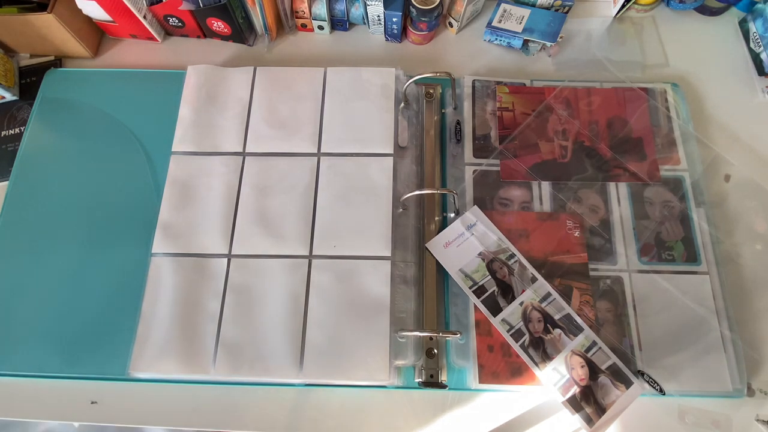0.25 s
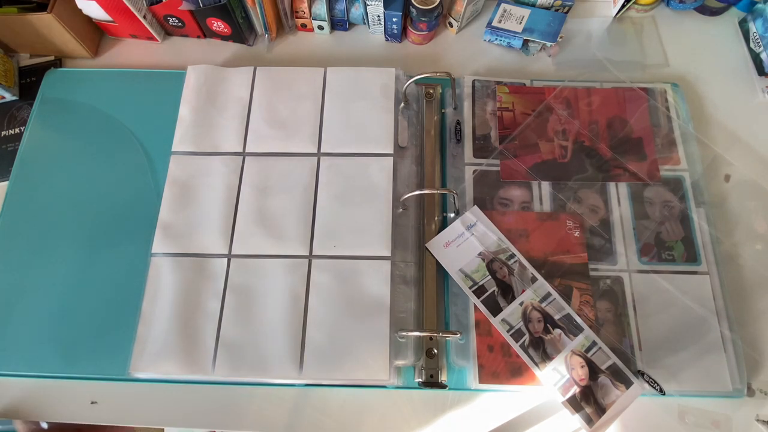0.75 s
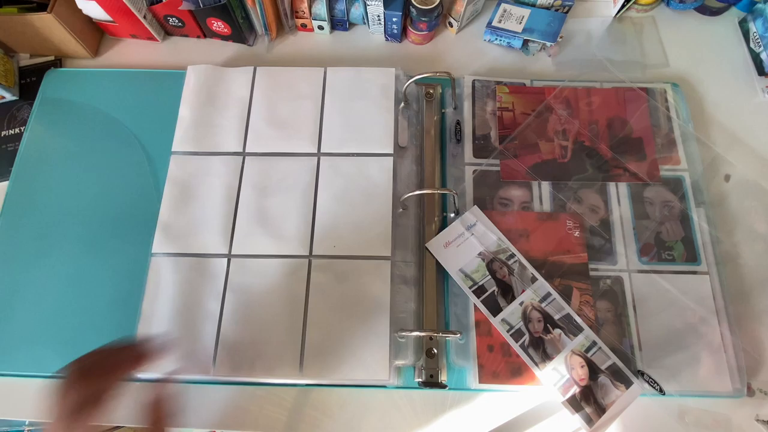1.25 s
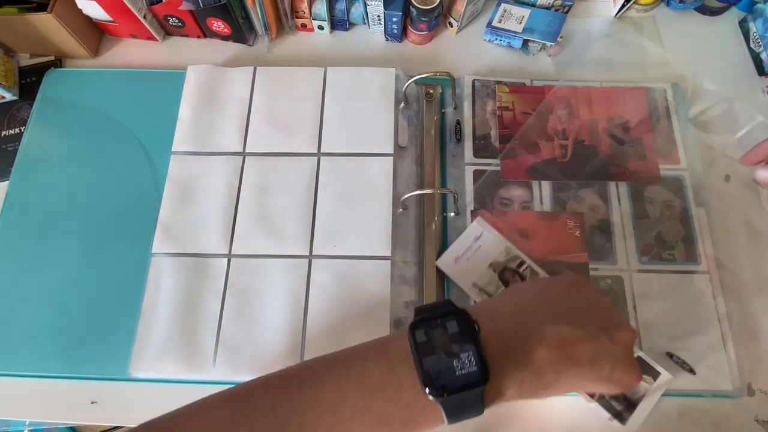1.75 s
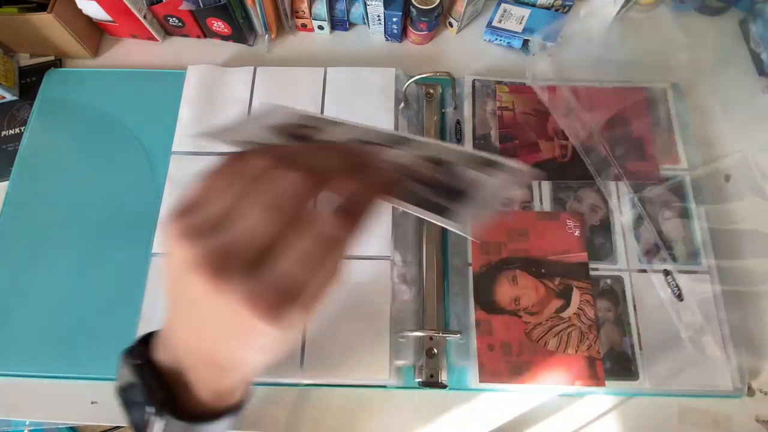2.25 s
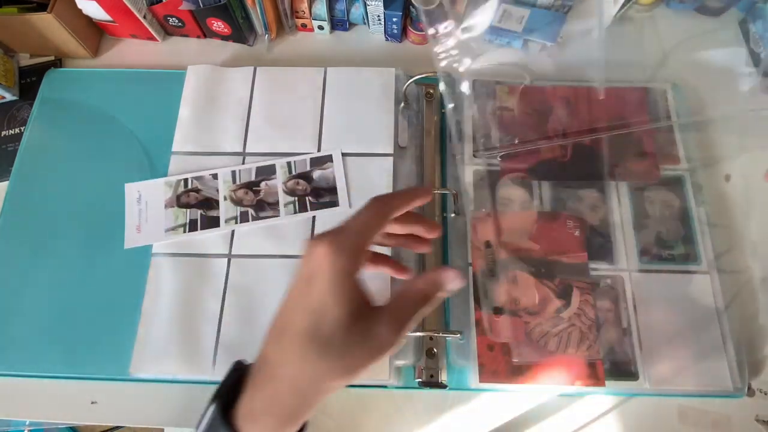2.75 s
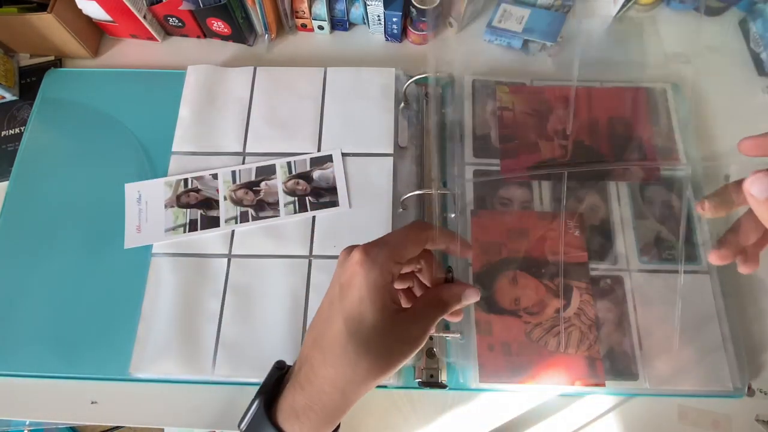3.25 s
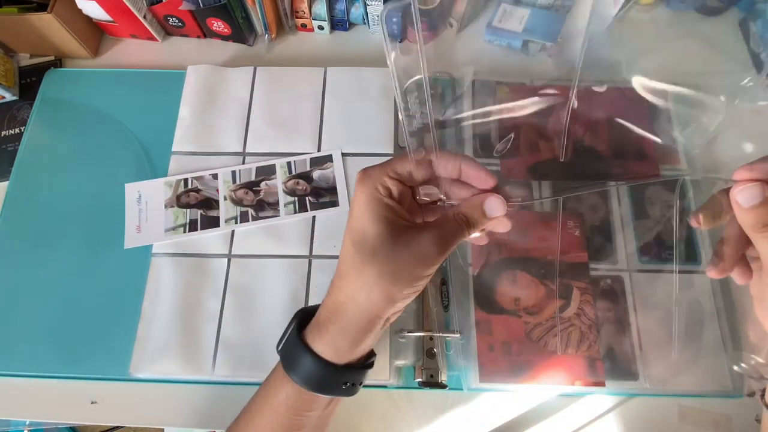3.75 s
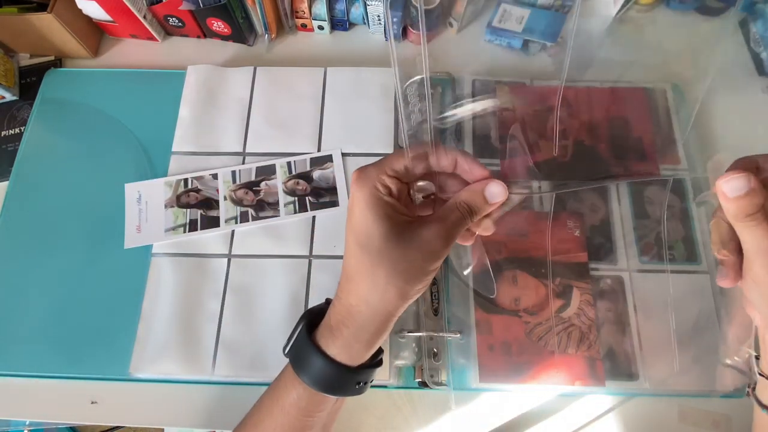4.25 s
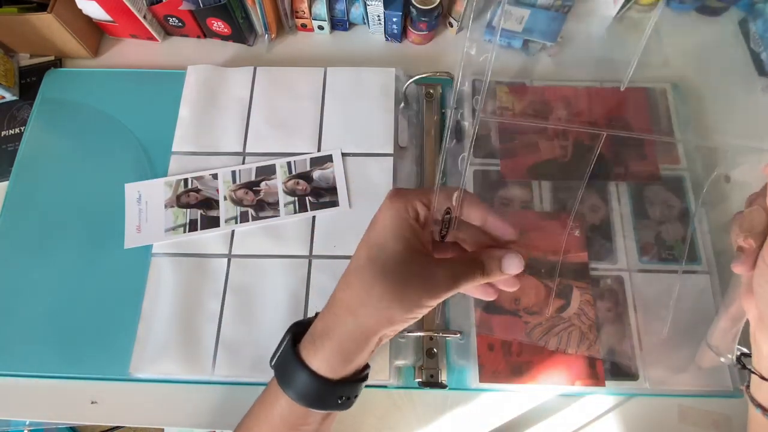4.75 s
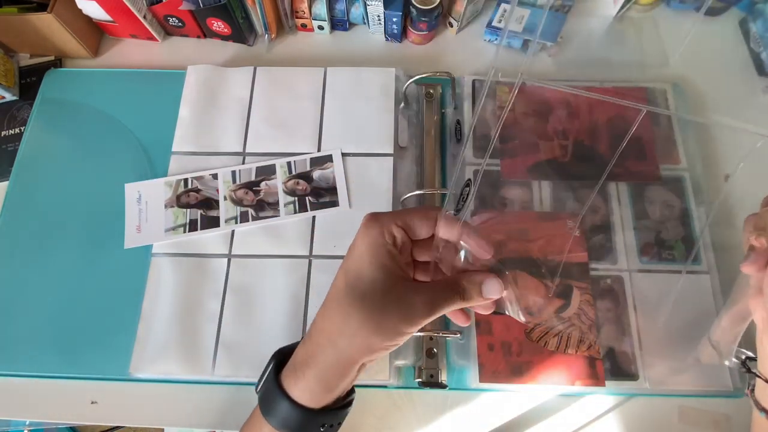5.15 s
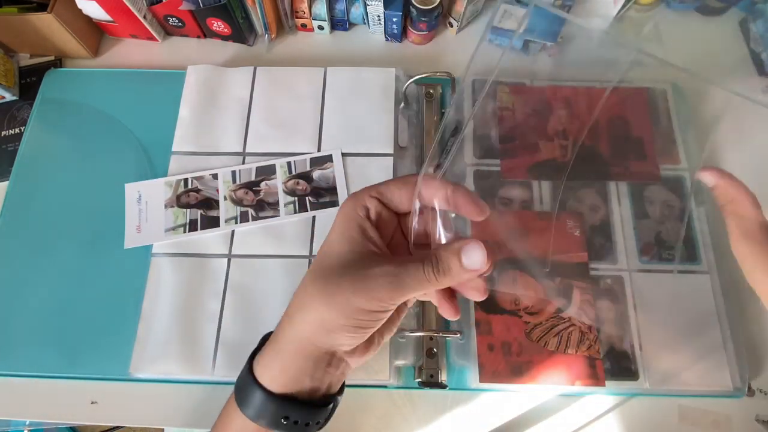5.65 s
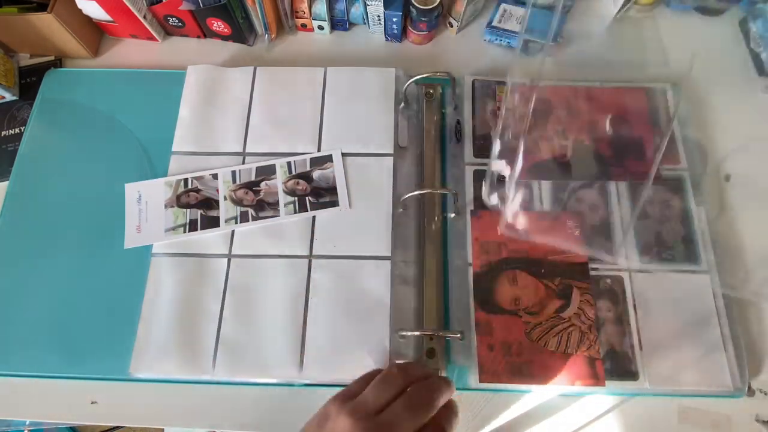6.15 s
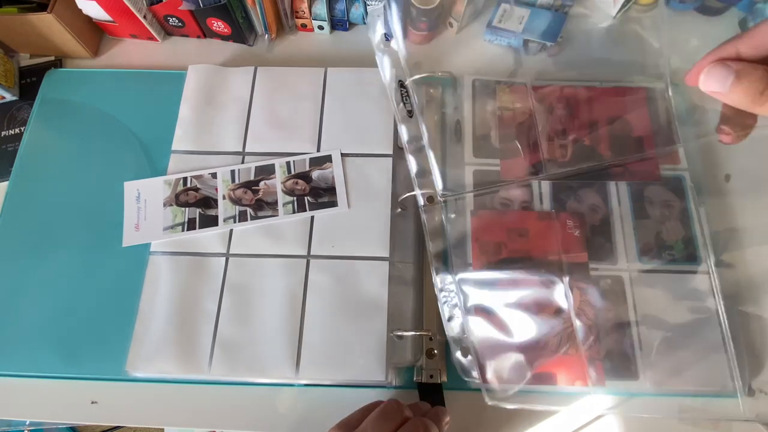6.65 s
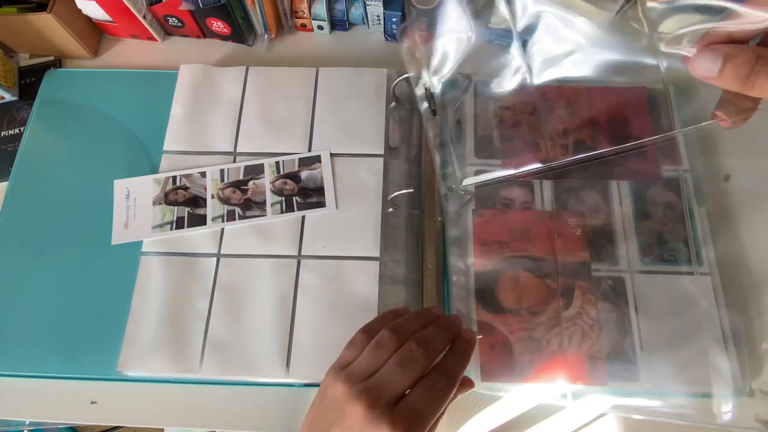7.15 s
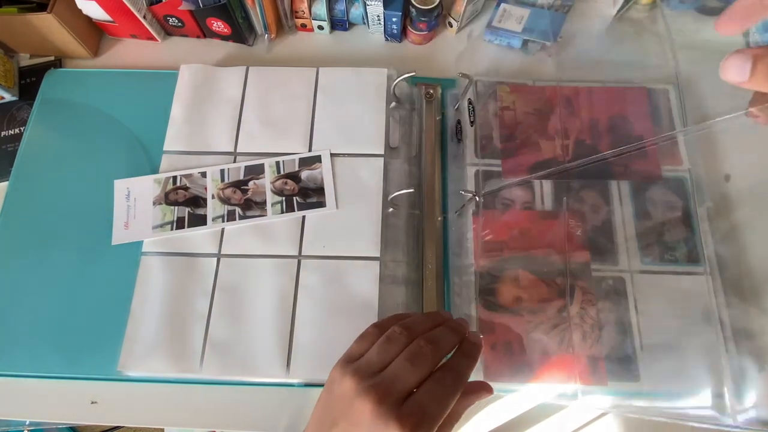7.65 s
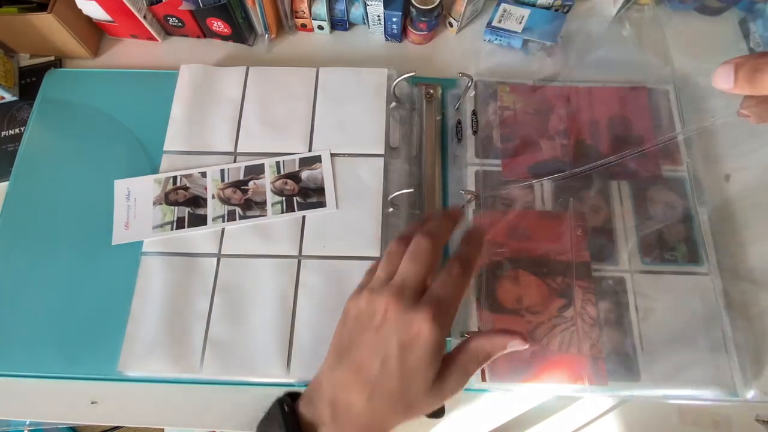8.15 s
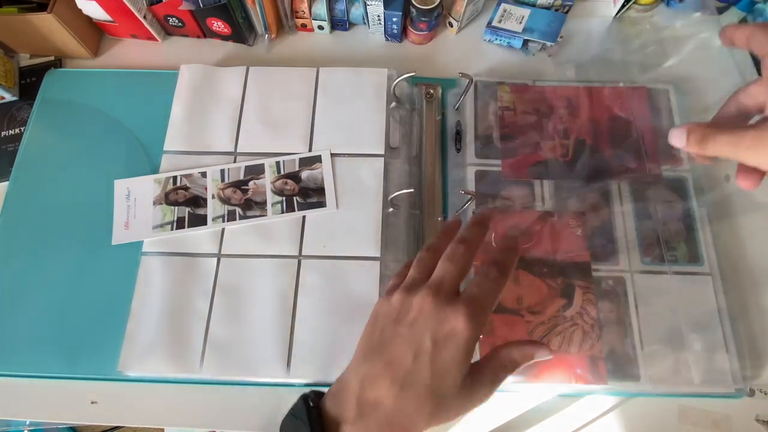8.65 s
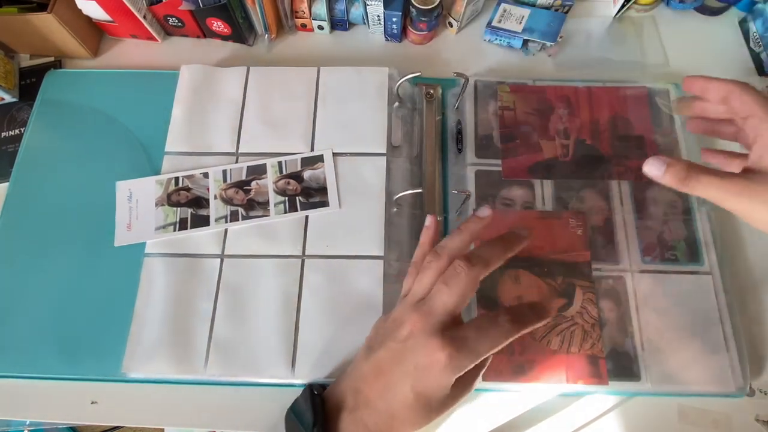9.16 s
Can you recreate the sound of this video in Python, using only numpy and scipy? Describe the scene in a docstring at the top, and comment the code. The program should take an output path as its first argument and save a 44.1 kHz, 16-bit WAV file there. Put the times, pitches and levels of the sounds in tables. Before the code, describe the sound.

Clear plastic sleeves crackle and pop loudly under busy hands, thin to sparse crinkles, then binder rings snap open and later click shut sharply.

```python
"""Film pops loudly amid rustle and hiss: hands turn clear plastic sleeves in a ring binder on a desk.
Creases pop as dispersed pushes; rustle and hiss are noise flaring at tiny creases; rubs are banded noise.
The steel rings snap open, later shut: short noise rattles ring steel and cover modes and crack in the treble.
The desk drones under the hands; a small room answers by noise-tail convolution, over a low shaped-noise hum."""
import sys
import numpy as np
from scipy import signal
from scipy.fft import rfft, irfft, next_fast_len
from scipy.io import wavfile
from scipy.ndimage import map_coordinates

SR = 44100
rng = np.random.default_rng(int(sys.argv[2]) if len(sys.argv) > 2 else 0)


def convert_level_to_amplitude(level_db):
    """Map a level in decibels to its linear amplitude factor."""
    exponent = np.asarray(level_db, float) / 20
    return 10 ** exponent


def dump(signal):
    """Clip the signal to [-1, 1] and save it as 16-bit WAV at the path in sys.argv[1]."""
    limited = np.clip(np.atleast_2d(signal).T, -1, 1)
    pcm = np.round(limited * 32767).astype(np.int16)
    wavfile.write(sys.argv[1], SR, pcm)


N = 414521
TIME = np.arange(N) / SR

# Levels are relative, ahead of pan and treble colour. Pan: left minus right; lag: left behind right.
# creases buckling; the row at 6.43 s is a low knock of the binder cover:
# (time [s], level [dB], brightness [octaves above FILM_PARTS row 2], thump [dB])
# brightness beyond the top part only makes the pop quieter
POPS = [(.0353, -14.5, 6, -41), (.05, -33, -2, -69.5), (.0785, -41, 5, -63), (.2112, -32, 2.6, -67),
        (.222, -43, 2.2, -66), (.3158, -26.5, 3.5, -62), (.3913, -27, 4, -50), (.5204, -29, 12, -52),
        (.742, -22, 2.5, -59), (.811, -33, 2, -60), (.846, -23.5, 2, -52), (.907, -27, 2.5, -47),
        (1.5143, -46.5, 2, -78), (1.605, -46.5, 1, -68), (1.7358, -45, .5, -84), (5.6096, -38, -0.34, -44),
        (5.957, -36, 2, -52.5), (7.3866, -54.5, 1.6, -57), (7.6972, -41, 1.26, -57.5),
        (8.622, -50, 1.5, -72.5), (8.961, -51, 2.5, -66), (.1177, -23, 5.5, -67), (.1487, -15, 4, -74),
        (.2937, -28, 2, -71), (.449, -11.5, 4.5, -56), (.125, -23, 2, -67), (.562, -19, 5.5, -57),
        (.7083, -17, 3.5, -54), (.7538, -25, 2, -65), (1.021, -25, 4, -54), (1.349, -54, 2.5, -82),
        (7.803, -56.5, 1.5, -58.5), (1.1304, -24.5, 2.5, -41.5), (1.5424, -31.5, 6, -56),
        (1.835, -22, 9, -52), (1.862, -33.5, -0.1, -50), (1.866, -30, 4, -70), (1.877, -49, 1.5, -58),
        (2.032, -50, 1, -55), (1.9158, -37.5, 0.75, -44.5), (1.9566, -39, 0, -53), (2.085, -40, 1.63, -47),
        (2.1672, -29, 1.08, -36), (2.255, -50.5, -0.1, -44.5), (2.44, -50.5, 5, -80),
        (2.587, -48.5, 4, -62), (2.4797, -33.5, 7, -54.5), (2.5306, -35.5, 3.5, -44),
        (2.7366, -28.5, 5, -68.5), (2.9976, -48.5, 1.5, -47.5), (3.013, -49, 5.5, -43),
        (3.0216, -44, 1.8, -42), (3.077, -47, 1.5, -37.5), (3.0834, -24, 0.66, -36.5),
        (3.359, -49, -2.5, -48), (3.217, -58, 3.5, -42), (3.3776, -27, 0.18, -37.5),
        (3.474, -40, -0.5, -49.5), (3.5102, -52, 2.5, -62), (3.608, -33.5, 1.75, -49),
        (3.6487, -36.5, 2, -36.5), (3.6716, -39, 0, -32), (3.7711, -18.5, 1, -34.5),
        (3.7908, -22.5, 1.32, -38), (3.8434, -30, 1.04, -27), (3.862, -16, -1.07, -36),
        (4.199, -40, 0, -44.5), (4.4855, -37.5, 1.1, -42), (4.5012, -31.5, 2, -49), (4.6688, -45, 0.6, -63),
        (4.7228, -46.5, 0.5, -33), (4.8571, -37, 0.5, -51), (4.9362, -47, 2, -42.5),
        (5.0116, -50.5, 2, -45.5), (5.1014, -43, 1.84, -96), (5.1955, -54, 0.5, -47.5),
        (5.22, -51, 1.5, -47), (5.418, -45, 2, -42), (5.481, -52, 1, -46), (5.3948, -34, 7.5, -51),
        (5.4345, -33, 2.1, -38), (5.4455, -27.5, 0, -45), (5.55, -57, 5, -47), (5.5848, -47, 0.5, -40.5),
        (5.6326, -25, 0.7, -47), (5.7033, -36, 0.7, -43), (5.7229, -34, 3, -35.5), (5.795, -35, 1.5, -34),
        (5.8029, -18, 0, -60), (5.8162, -12.5, 1.3, -46), (5.8306, -32, 6.5, -33),
        (5.872, -32, -1.5, -34.5), (6.1037, -42, 2, -41), (6.133, -36.5, 1, -35),
        (6.1475, -30.5, 0.56, -37), (6.203, -36, 1, -36), (6.32, -47, 0.3, -51), (6.427, -72.5, 5, -45.5),
        (7.0825, -39.5, 1.15, -48), (7.1423, -48.5, 0.94, -53.5), (7.1756, -49, 1.04, -57.5),
        (7.225, -49, 1.66, -66), (7.2767, -45, 2, -50), (7.4694, -49, 1.5, -59), (7.485, -44.5, 1, -55),
        (7.569, -43.5, 1.5, -73), (7.6457, -31.5, 1.5, -63), (7.7058, -44, 1.5, -52.5),
        (7.9305, -39, 1.34, -49.5), (8.0266, -38.5, 1.5, -79), (8.2283, -47.5, 1.7, -58.5),
        (9.162, -55.5, 1.5, -99.5)]
# parts of a pop, thump first: (frequency [Hz], width [Hz])
FILM_PARTS = [(300, 588), (850, 1470), (1500, 1990), (2700, 3380), (8000, 5000)]
# steady contact of hands and film: (time [s], rustle [dB], sliding hiss [dB])
HAND_CONTACT = [(0, -48.5, -44.5), (.62, -47.5, -45), (.68, -52.5, -53.5), (1.0, -60.5, -59),
                (1.16, -54.5, -53), (1.3, -94.5, -91), (1.48, -78.5, -82), (1.75, -62.5, -61.5),
                (2.12, -68.5, -64.5), (2.28, -95, -97), (2.98, -100, -92.5), (3.2, -75.5, -71.5),
                (3.5, -75, -74.5), (3.56, -97.5, -95), (4.0, -85, -89.5), (4.32, -72.5, -69),
                (4.7, -83.5, -76.5), (4.8, -102, -86.5), (5.67, -89, -85), (5.73, -75, -60),
                (5.86, -88, -63), (6.21, -59.5, -67), (6.27, -90.5, -90.5), (9.4, -89.5, -86.5)]
# short swipes of film on film: (loudest time [s], length [s], rustle [dB], hiss [dB])
SWIPES = [(0.21, 0.18, -72, -45), (0.447, .1, -63.5, -48.5), (0.757, .4, -47.5, -43),
          (1.089, 0.16, -52, -46.5), (1.36, .15, -78, -72), (1.557, 0.28, -68, -66), (1.862, .1, -54, -56),
          (2.171, 0.11, -58, -69), (2.517, .22, -76.5, -68), (2.753, 0.11, -81.5, -62),
          (3.017, .08, -59, -74.5), (3.126, 0.13, -56.5, -58), (3.27, 0.1, -68, -72.5),
          (3.386, 0.12, -61, -70), (3.652, .2, -64, -72.5), (3.796, 0.077, -66.5, -65.5),
          (3.92, 0.14, -68.5, -70.5), (4.483, 0.099, -66, -65), (4.653, 0.16, -70, -66),
          (4.867, 0.3, -74, -66.5), (5.217, 0.3, -75, -69), (5.41, 0.25, -57.5, -60.5),
          (5.502, .12, -61, -62.5), (5.548, .08, -53.5, -60.5), (5.712, .1, -48, -56),
          (5.818, .12, -42.5, -53), (5.882, .1, -58, -59), (5.963, .14, -58, -56), (6.298, 0.065, -70, -68),
          (6.953, 0.13, -64, -76.5), (7.16, 0.13, -66, -86), (7.284, 0.2, -81, -74.5),
          (7.467, 0.1, -68.5, -67), (7.576, 0.076, -66, -81), (7.677, .14, -63.5, -66),
          (7.977, .4, -70, -78), (8.214, 0.13, -65.5, -80), (8.659, 0.23, -64, -74),
          (8.902, .3, -69, -69.5)]
# sheet flexing as a whole: (time [s], level [dB])
FLEXING = [(0.0, -62), (0.73, -55), (1.33, -72), (2.02, -62.5), (2.85, -79.5), (3.27, -58), (4.32, -75.5),
           (4.74, -64), (5.39, -78), (5.68, -48), (6.54, -77), (6.99, -59.5), (7.46, -66.5), (8.74, -71.5),
           (8.98, -81), (9.4, -64.5)]
# where the hands work: (time [s], pan [dB])
HAND_PAN = [(0.0, 4.5), (1.44, 3.5), (1.65, 1), (2.12, -3), (2.7, 4.5), (3.4, -3.5), (3.59, -1.5),
            (4.4, -2), (5.2, -5), (5.89, -1.5), (6.2, -3), (6.7, 2.5), (8.2, 3.5), (9.4, -1)]
# noise spectra of flexing, rustle and hiss: (frequency [Hz], relative density [dB])
FLEX_SPECTRUM = [(25, -32), (45, -13.5), (70, 8.5), (130, 0.5), (250, -5.5), (500, -29), (900, -54.5)]
RUSTLE_SPECTRUM = [(150, -38.5), (300, -2.5), (650, -6.5), (1100, -1.5), (1500, -7), (2200, -5.5),
                   (3000, -21), (5000, -47.5)]
HISS_SPECTRUM = [(1200, -43.5), (2500, -1), (4000, 1), (6500, -1), (10000, -6.5), (16000, -2.5)]
# short banded noises: mostly rubs on film, at 6.58 s the low ring after the lever click:
# (start [s], length [s], frequency [Hz], width [Hz], level [dB])
BANDED_NOISES = [(0.728, 0.055, 3770, 2000, -41), (1.722, 0.16, 1150, 790, -62.5),
                 (3.113, 0.029, 4830, 2610, -54.5), (4.253, 0.14, 5030, 3000, -77.5),
                 (5.195, 0.08, 4800, 2860, -64), (5.271, 0.079, 3700, 1510, -73.5),
                 (5.469, 0.027, 960, 500, -56.5), (5.505, 0.055, 2320, 400, -67),
                 (6.579, 0.051, 337, 59, -57), (8.608, 0.084, 1397, 1100, -64.5),
                 (8.733, 0.062, 1550, 1200, -72.5), (8.876, 0.059, 1437, 694, -70),
                 (8.948, 0.08, 1430, 600, -66.5)]
# ring mechanism contacts: (time [s], steel ring [dB], cover knock [dB], crack [dB])
SNAPS = [(6.335, -55, -80, -94), (6.3574, -37.5, -53, -48.5), (6.48, -64, -83, -92),
         (6.3827, -51, -62.5, -69), (6.521, -62.5, -75.5, -84), (6.561, -55.5, -60.5, -78.5),
         (6.5786, -34.5, -49, -36.5), (6.7885, -36.5, -49, -46), (6.7937, -11.5, -26, -19.5),
         (6.7963, -17, -13.5, -18.5), (6.8018, -22.5, -14.5, -20), (6.809, -21.5, -21, -29.5),
         (6.821, -30, -29.5, -34), (9.2673, -6.5, -41, -8.5), (9.272, -24, -27.5, -17),
         (9.2903, -39.5, -50, -38)]
# steel ring modes: (frequency [Hz], width [Hz], level [dB])
RING_MODES = [(1781, 260, -1), (1480, 110, -8.5), (1755, 15, -3), (2180, 140, 0), (2406, 150, -3.5),
              (3080, 450, -6.5), (4100, 370, -3.5), (4832, 260, -1)]
# binder cover and desk modes: (frequency [Hz], width [Hz], level [dB])
COVER_MODES = [(55, 37, -5.5), (171, 45, 2.5), (250, 50, -2.5), (332, 21, -4.5), (611, 110, 0.5),
               (1100, 170, 1.5)]
# hand leaning or dragging on the desk: (start [s], length [s], level [dB])
LEANS = [(0, 0.36, -56.5), (0.412, 0.071, -50), (0.526, 0.13, -54), (0.708, 0.11, -50),
         (0.822, 0.093, -48.5), (1.015, 0.1, -51.5), (1.121, 0.067, -51.5)]
# low thumps: pages or palm settling, the last one under the rings snapping shut:
# (start [s], length [s], level [dB])
LOW_THUMPS = [(3.0, 0.082, -51.5), (7.64, 0.1, -58), (8.05, 0.056, -63), (8.22, 0.093, -62.5),
              (8.51, 0.083, -68), (8.64, 0.13, -66.5), (9.28, 0.062, -54)]
# room decay: (frequency [Hz], time to fall 60 dB [s])
ROOM_DECAY = [(150, 0.31), (1000, 0.18), (5000, 0.26), (14000, 0.19)]
# hum spectrum: (frequency [Hz], relative density [dB])
HUM_SPECTRUM = [(15, -33.5), (25, -18), (39, 1), (72, -4.5), (114, 1), (157, -24.5), (591, -24.5),
                (962, -27), (1160, -38.5), (1290, -30.5), (16000, -45)]
# treble colour of the whole: (frequency [Hz], gain [dB])
TREBLE_COLOUR = [(8300, 1.5), (9300, -0.5), (10300, 3.5), (12200, 1.5), (13200, -13), (14300, -1),
                 (16000, -5.5), (16800, -40)]

# a pop's fall below and above its brightness
UNDER_DB_PER_OCTAVE, OVER_DB_PER_OCTAVE_SQUARED = 3.5, 6.5
# crackles: mean level over the hiss, thump under that level
CRACKLE_COUNT, CRACKLE_DB, CRACKLE_THUMP_DB = 60, 8, -18
# swipes: share of the length spent rising; the hold and the fall are counted in rise or fade lengths
SWIPE_RISE_SHARE, SWIPE_HOLD_LENGTHS, SWIPE_FALL_DB_PER_LENGTH = 0.23, 0.15, 26.5
STROKE_EDGE_S, STUTTER_DB = 0.021, 4
# pitch a blow favours: opening lever, then lower as the halves slam shut
LEVER_HZ, SHUT_HZ, SHUT_FROM_S, RINGS_FALL_DB_PER_OCTAVE = 2310, 1740, 9.1, 10
RATTLE_T60_S = 0.031
RINGS_PAN_DB, COVER_PAN_DB, CRACK_PAN_DB = 2.5, 0.5, -4.4
RINGS_LAG_SAMPLES, COVER_LAG_SAMPLES, CRACK_LAG_SAMPLES = -3, 9, 8
DESK_HZ, DESK_WIDTH_HZ = 158, 85
THUMP_HZ, THUMP_WIDTH_HZ = 71, 54
HUM_DB = -72.5
SIDES = np.array([[0.5], [-0.5]])  # left, right


def unit(x):
    """Scales to rms 1."""
    return x / np.sqrt(np.mean(x ** 2) + 1e-20)


def peak(x):
    """Scales to peak 1."""
    return x / np.abs(x).max()


def along(points, hz):
    """Reads (frequency, value) points on a log frequency axis."""
    f, v = np.transpose(points)
    return np.interp(np.log(hz + 1), np.log(f + 1), v)


def curves(rows):
    """One value per sample for each column after the time."""
    s, *columns = np.transpose(rows)
    return [np.interp(TIME, s, c) for c in columns]


def wobble(rate_hz):
    """Smooth random curve, rate_hz knots a second."""
    knots = rng.standard_normal(int(N * rate_hz / SR) + 4)
    return map_coordinates(knots, [TIME * rate_hz])


def filtered(x, response):
    """Applies a complex response of frequency."""
    m = next_fast_len(x.shape[-1] + 8192)
    return irfft(rfft(x, m) * response(np.fft.rfftfreq(m, 1 / SR)), m)[..., :x.shape[-1]]


def shaped(x, spectrum):
    """Applies (frequency, dB) points as a filter."""
    return filtered(x, lambda f: convert_level_to_amplitude(along(spectrum, f)))


def modes(table):
    """Causal response of resonances with alternating signs."""
    def response(f):
        total = 0
        for k, (hz, width, db) in enumerate(table):
            damping = 1j * f * width
            total = total + (-1) ** k * convert_level_to_amplitude(db) * damping / (hz * hz - f * f + damping)
        return total
    return response


def band(hz, width):
    """One resonance applied twice: steep on both sides."""
    return lambda f: modes([(hz, width, 0)])(f) ** 2


def lag_samples(pan_db):
    """The nearer microphone hears it louder and earlier: samples by which left lags."""
    return -12 * np.tanh((pan_db / 3) ** 3)


def add(stereo, sound, s, pan_db, lag):
    """Places one short sound between the microphones by level and delay."""
    for channel, sign in zip(stereo, (.5, -.5)):
        channel[round(s * SR + sign * lag):][:len(sound)] += convert_level_to_amplitude(sign * pan_db) * sound


def pops():
    """A crease flips: a push spread by bending waves, a shiver of the film, an echo off the desk."""
    out, t = np.zeros((2, N + SR)), np.arange(2400) / SR
    pan_db, = curves(HAND_PAN)
    part_hz, width = np.transpose(FILM_PARTS)
    octave = np.log2(part_hz[1:] / part_hz[1])

    def bending(f):  # low notes travel slower in a sheet
        return np.exp(-2j * np.pi * .19 * np.sqrt(f + 40))

    for s, db, bright, thump_db in [*POPS, *crackles()]:
        under_db = UNDER_DB_PER_OCTAVE * (bright - octave)
        over_db = OVER_DB_PER_OCTAVE_SQUARED * np.maximum(octave - bright, 0) ** 2
        parts_db = [thump_db, *(db - np.maximum(under_db, over_db))]
        # a narrow part needs more per Hz for the same peak
        level_db = parts_db + 20 * np.log10(SR / 2 / width)
        colour = [(40, level_db[0] - 0.5), *zip(part_hz, level_db), (20000, level_db[-1] + 1.5)]
        noise, chance = rng.standard_normal(len(t)), rng.random(2)
        push = (t == 0) + .055 * noise * convert_level_to_amplitude(-60 * t / .022)
        push += .3 * np.roll(push, round((0.0012 + 0.001 * chance[0]) * SR))
        # air trapped in the sleeve rings briefly
        pocket = modes([(260 + 100 * chance[1], 55, 7)])
        # the flat facet beside the crease rings at a pitch set by the brightness, within limits
        facet_hz = np.clip(part_hz[1] * 2 ** bright, 500, 6000)
        facet = modes([(facet_hz, 0.25 * facet_hz, -1.0)])
        spread = filtered(np.pad(push, (200, 0)), lambda f: bending(f) * (1 + pocket(f)) * (1 + facet(f))
                          * convert_level_to_amplitude(along(colour, f)))
        here_db = pan_db[round(s * SR)]
        add(out, spread, s - 255 / SR, here_db, lag_samples(here_db))  # offsets padding and travel
    return out[:, :N]


def crackles():
    """Small bright creases flip at random, mostly where the sliding is loud."""
    hiss_db, chance = hands()[1], rng.random((CRACKLE_COUNT, 3))
    busy = np.cumsum(convert_level_to_amplitude(hiss_db))
    at = np.searchsorted(busy / busy[-1], chance[:, 0] * .999)
    db = hiss_db[at] + CRACKLE_DB + 10 * (chance[:, 1] - .5)
    bright = 1.5 + 1.8 * chance[:, 2]
    return np.transpose([at / SR + .01, db, bright, db + CRACKLE_THUMP_DB])


def hands():
    """Rustle and hiss levels in dB: steady contact plus swipes that grow fast and fade slower."""
    power = convert_level_to_amplitude(curves(HAND_CONTACT)) ** 2
    for s, length, *levels_db in SWIPES:
        near = slice(max(round((s - 2 * length) * SR), 0), round((s + 2 * length) * SR))
        before = (s - TIME[near]) / SWIPE_RISE_SHARE
        after = (TIME[near] - s) / (1 - SWIPE_RISE_SHARE)
        away = np.maximum(before, after) / length
        fall_db = SWIPE_FALL_DB_PER_LENGTH * np.maximum(away - SWIPE_HOLD_LENGTHS, 0)
        power[:, near] += convert_level_to_amplitude(np.add.outer(levels_db, -fall_db)) ** 2
    return 10 * np.log10(power)


def creases(per_second, t60_s, grip):
    """Envelope of tiny creases of scattered size; they cluster when the grip tightens."""
    happens = rng.random(N) < per_second / SR * convert_level_to_amplitude(4 * grip)
    starts = convert_level_to_amplitude(np.minimum(3 * rng.exponential(size=N), 8)) * happens
    return unit(signal.fftconvolve(starts, convert_level_to_amplitude(-60 * TIME[:1500] / t60_s))[:N])


def grains(spectrum, envelope, share):
    """Friction noise that flares at every tiny crease, rms 1."""
    return unit(shaped((1 + share * envelope) * rng.standard_normal(N), spectrum))


def handling():
    """The sheet flexes, rustles and slides; all follow the hand from side to side."""
    (flex_db,), (pan_db,) = curves(FLEXING), curves(HAND_PAN)
    rustle_db, hiss_db = hands()
    force = np.clip((hiss_db + 67.5) / 22, .15, 1)  # light sliding is smooth, hard handling crackles
    grip = wobble(25)  # fingers tighten and slacken
    fine = force * creases(220, .0025, grip)
    coarse = creases(45, .022, grip)
    uneven = convert_level_to_amplitude(.8 * grip)

    def flex():
        return convert_level_to_amplitude(flex_db + 3 * wobble(15)) * grains(FLEX_SPECTRUM, coarse, share=.3)

    def rustle():
        return convert_level_to_amplitude(rustle_db) * uneven * grains(RUSTLE_SPECTRUM, coarse + fine, share=.5)

    def hiss():
        return convert_level_to_amplitude(hiss_db) * uneven * grains(HISS_SPECTRUM, fine, share=.85)

    # hard handling also shakes the binder cover; its top mode hums on
    shake = unit(filtered(rng.standard_normal(N), modes(COVER_MODES[1:])))
    top_mode = unit(filtered(rng.standard_normal(N), band(*COVER_MODES[-1][:2])))
    cover = force ** 2 * (convert_level_to_amplitude(hiss_db - 20.5) * shake + convert_level_to_amplitude(hiss_db - 10.5) * top_mode)
    sheet = flex() + rustle() + hiss() + cover
    n = np.arange(N)
    delayed = [np.interp(n - np.round(side), n, sheet) for side in SIDES * lag_samples(pan_db)]
    # a wide sheet sounds from many places, so each microphone hears some of its own
    own = [convert_level_to_amplitude(-2.0) * flex() + convert_level_to_amplitude(5.5) * rustle() + convert_level_to_amplitude(7.0) * hiss() for _ in SIDES]
    return convert_level_to_amplitude(SIDES * pan_db - 6.0) * (np.array(delayed) + own)


def stroke(s, length):
    """Envelope of a short contact with soft edges."""
    inside = np.minimum(TIME - s, s + length - TIME)
    return np.clip(inside / STROKE_EDGE_S + .5, 0, 1) ** 2


def banded_noises():
    """Short stuttering noises through one resonance, partly each microphone's own; mostly rubs on film."""
    out, (pan_db,) = np.zeros((2, N + SR)), curves(HAND_PAN)
    stutter = convert_level_to_amplitude(STUTTER_DB * wobble(64))
    for s, length, hz, width, db in BANDED_NOISES:
        near = slice(round((s - .03) * SR), round((s + length + .03) * SR))
        shape = (stroke(s, length) * stutter)[near]
        noise = rng.standard_normal((3, len(shape)))
        pair = convert_level_to_amplitude(db) * shape * unit(filtered(noise[0] + noise[1:], band(hz, width)))
        out[:, near] += convert_level_to_amplitude(SIDES * pan_db[near]) * pair
    return out[:, :N]


def snaps():
    """Each contact is a short rattle that rings the steel, knocks the cover and cracks in the treble."""
    out, t = np.zeros((2, N + SR)), np.arange(SR // 4) / SR
    dying_db = 60 * t / RATTLE_T60_S
    for s, ring_db, knock_db, crack_db in SNAPS:
        shutting = s > SHUT_FROM_S
        favoured_hz = SHUT_HZ if shutting else LEVER_HZ
        rattle = rng.standard_normal((3, len(t))) * convert_level_to_amplitude(-dying_db) * (1 - np.exp(-t / .0015))
        rattle[:2, 70] += 8  # the blow, on steel and cover
        steel = [(f, w, db - RINGS_FALL_DB_PER_OCTAVE * abs(np.log2(f / favoured_hz)) + rng.normal())
                 for f, w, db in RING_MODES]
        cover = COVER_MODES[2:] if shutting else COVER_MODES  # shutting shakes only the spine
        longer = rattle[1] * convert_level_to_amplitude(0.5 * dying_db)  # the cover shakes longer than the steel
        ring = convert_level_to_amplitude(ring_db) * peak(filtered(rattle[0], modes(steel)))
        knock = convert_level_to_amplitude(knock_db) * peak(filtered(longer, modes(cover)))
        crack = convert_level_to_amplitude(crack_db) * peak(filtered(rattle[2], band(6400, 20000)))
        add(out, ring, s, RINGS_PAN_DB, RINGS_LAG_SAMPLES)
        add(out, knock, s, COVER_PAN_DB, COVER_LAG_SAMPLES)
        add(out, crack, s, CRACK_PAN_DB, CRACK_LAG_SAMPLES)
    return out[:, :N]


def drone(rows, hz, width):
    """Banded noise that sounds during each stroke."""
    envelope = sum(convert_level_to_amplitude(db) * stroke(s, length) for s, length, db in rows)
    return envelope * unit(filtered(rng.standard_normal(N), band(hz, width)))


def desk():
    """The desk top drones while a hand bears on it; soft thumps sound lower."""
    return drone(LEANS, DESK_HZ, DESK_WIDTH_HZ) + drone(LOW_THUMPS, THUMP_HZ, THUMP_WIDTH_HZ)


def room(x):
    """Each frequency dies at its own speed; every quarter second finds its own set of reflections."""
    out, step = np.zeros((2, N + SR)), SR // 4
    for start in range(0, N, step):
        hz, t, z = signal.stft(rng.standard_normal((2, SR // 3)), SR, nperseg=256)
        decay = convert_level_to_amplitude(-60 * t / along(ROOM_DECAY, hz)[:, None])
        tail = signal.istft(z * decay, SR, nperseg=256)[1]
        wet = signal.fftconvolve(x[None, start:start + step], tail / np.linalg.norm(tail[0]), axes=1)
        out[:, start + 250:][:, :wet.shape[1]] += wet  # reflections start 250 samples late
    return out[:, :N]


def hum():
    """Room tone: noise shared in the bass, each microphone's own above."""
    shared, own = rng.standard_normal(N), rng.standard_normal((2, N))
    swell_db = 2 * wobble(6)

    def bass(f):
        return 1 / (1 + (f / 300) ** 2)

    mix = filtered(shared, lambda f: np.sqrt(bass(f))) + filtered(own, lambda f: np.sqrt(2 - 2 * bass(f)))
    return convert_level_to_amplitude(HUM_DB + swell_db) * unit(shaped(mix, HUM_SPECTRUM))


def scene():
    """All sources in the room; the film is close, the rings throw more into the room."""
    film, steel = pops(), snaps()
    reflected = room(convert_level_to_amplitude(-9) * film.mean(0) + convert_level_to_amplitude(-5.0) * steel.mean(0))
    return film + steel + reflected + handling() + banded_noises() + desk() + hum()


def top_cut(x):
    """Nothing passes above the cut-off."""
    return signal.sosfilt(signal.butter(12, 16830, fs=SR, output="sos"), x)


def record(dry):
    """Colours the treble of the mix, with a dip near 13 kHz and a steep fall at the top."""
    heard = shaped(dry, TREBLE_COLOUR)
    return top_cut(heard)


dry = scene()
out = record(dry)
dump(out)
```